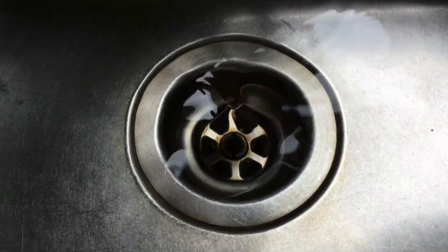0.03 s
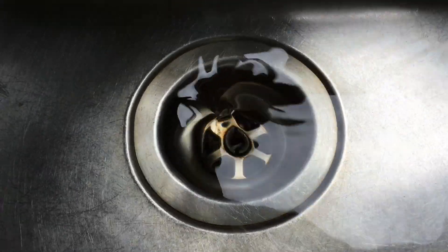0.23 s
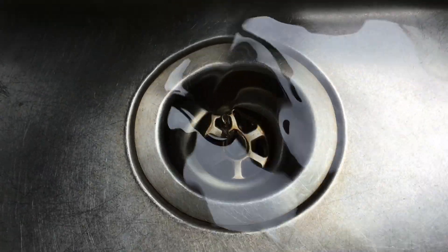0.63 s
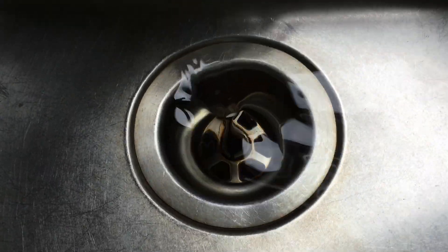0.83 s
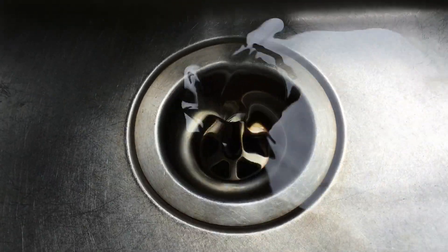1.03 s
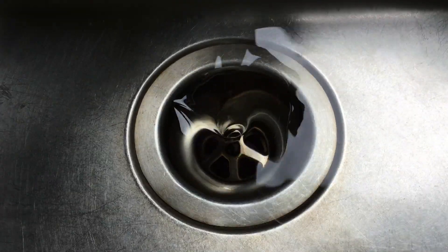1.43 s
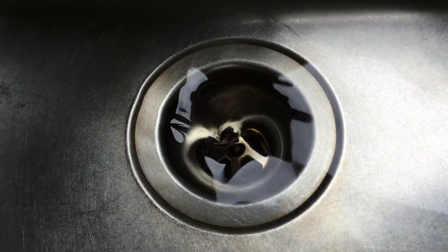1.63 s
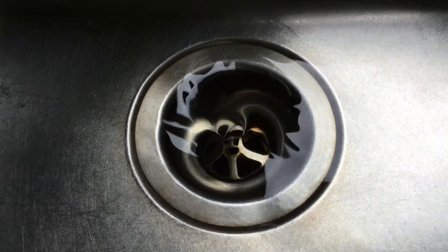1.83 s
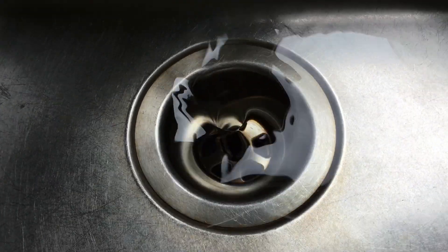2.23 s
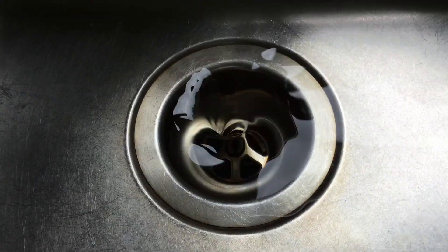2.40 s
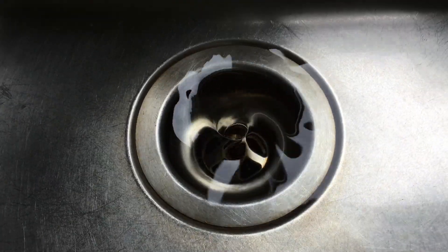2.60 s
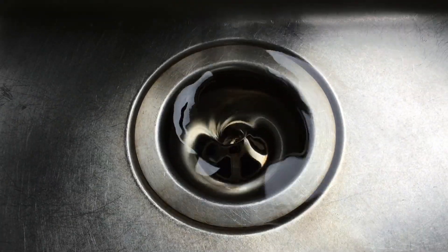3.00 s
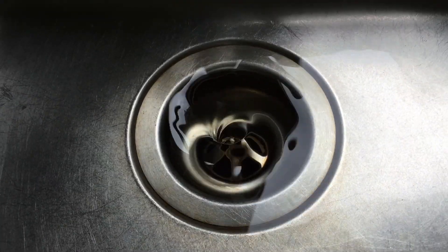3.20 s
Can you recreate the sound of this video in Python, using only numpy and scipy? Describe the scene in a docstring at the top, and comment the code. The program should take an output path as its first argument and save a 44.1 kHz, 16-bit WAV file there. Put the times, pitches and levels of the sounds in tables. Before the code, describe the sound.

Water gurgles down a steel kitchen sink drain, heard close over a steady low rush. From about 0.2 seconds, rapid, irregular hollow gulps join deep churning in the pipe and a light trickle. The gurgling is loudest around 1.2 to 1.6 seconds, with small splashes. It eases after 2.3 seconds, with a faint slurp near 2.5, and grows softer and sparser by 3.3 seconds.

```python
"""A steel kitchen sink, heard from close above, as water swirls down the drain.
Over a steady rush, churning water excites the low air modes of the waste pipe, drops and small bubbles
excite the modes of the drain's throat, and tiny bubbles fizz over the basin. The vortex gulps air:
each gulp rings the air pocket under the strainer and thumps the pipe. Splashes add clusters of pings."""
import sys
import numpy as np
from scipy import signal
from scipy.fft import rfft, irfft
from scipy.io import wavfile

SR = 44100
rng = np.random.default_rng(int(sys.argv[2]) if len(sys.argv) > 2 else 0)


def generate_wav(sig):
    """Save sig (samples, or channels by samples) to the path in sys.argv[1] as 16-bit PCM at SR."""
    pcm = np.round(np.clip(np.atleast_2d(sig).T, -1, 1) * 32767).astype(np.int16)
    wavfile.write(sys.argv[1], SR, pcm)


N = 147735
TIME = np.arange(N) / SR


def amp(db):
    """Amplitude ratio of a level in decibels."""
    return 10 ** (np.asarray(db) / 20)


def unit(x):
    """Normalisation to an rms of 1."""
    return x / np.sqrt(np.mean(x ** 2) + 1e-20)


def unit_peak(x):
    """Normalisation to a peak of 1."""
    return x / abs(x).max()


def add(mix, start_s, sound):
    """Superposition: a sound adds to the mix from its start time."""
    part = mix[max(round(start_s * SR), 0):][:len(sound)]
    part += sound[:len(part)]


def colour(x, curve):
    """Spectral shaping by rows of (frequency_hz, gain_db), interpolated in log frequency."""
    hz, db = np.transpose(curve)
    gain_db = np.interp(np.log(np.fft.rfftfreq(N, 1 / SR) + 1), np.log(hz), db)
    return irfft(rfft(x) * amp(gain_db), N)


def cavity(x, modes):
    """Modal superposition: neighbouring resonances alternate in sign, as along a tube."""
    out = np.zeros(len(x))
    for k, (hz, width_hz, db) in enumerate(modes):
        out += (-1) ** k * amp(db) * signal.lfilter(*signal.iirpeak(hz, hz / width_hz, SR), x)
    return out


def impulses(per_s, spread_db=1.5):
    """Poisson process: random impulses of either sign, mostly small and a few large."""
    chance, excess, sign = rng.random(N), rng.exponential(1, N), rng.choice([-1., 1.], N)
    return (chance < per_s / SR) * sign * amp(spread_db * np.minimum(excess, 19))


def ring(hz, peak_s, shape, glide_per_s=1, size=2600):
    """Damped oscillation of trapped air: a tone swells and dies as its pitch rises slightly."""
    t = np.arange(1, size + 1) / SR
    envelope = (t / peak_s * np.exp(1 - t / peak_s)) ** shape
    turns = np.cumsum(hz * (1 + glide_per_s * (t - peak_s))) / SR
    return envelope * np.sin(2 * np.pi * turns)


def swarm(low_hz, high_hz, per_s, spread_db, rise_cycles, shape=0.15, size=1300, count=60):
    """Minnaert resonance: bubbles ping at random times, each size at its own pitch."""
    out = np.zeros(N)
    pitches = np.geomspace(low_hz, high_hz, count)
    pings = [ring(hz, rise_cycles / hz, shape, glide_per_s=1.6, size=size) for hz in pitches]
    for when, which, strength, sign in rng.random((round(per_s * N / SR), 4)):
        db = spread_db * min(-np.log(1 - strength), 3.5)
        add(out, when * N / SR, np.sign(sign - .5) * amp(db) * pings[int(which * count)])
    return out


# Spectrum of the rushing water: frequency_hz, gain_db
RUSH_SPECTRUM = [(25, -32), (45, -12), (80, 0), (250, 4), (330, -17.5), (450, -37.5), (580, -16),
                 (666, -22), (780, -37.5), (900, -37), (1150, -37), (1340, -33), (1490, -9.5), (1710, -39),
                 (1900, -17.5), (2100, -39.5), (3700, -52.5), (6500, -63.5), (15500, -57)]
def rush():
    """Filtered noise: the steady rush of the water."""
    return amp(-43.5) * unit(colour(rng.standard_normal(N), RUSH_SPECTRUM))


# Relative levels of the flow through the drain: time_s, churn_db, trickle_db, fizz_db
FLOW_LEVELS = [(0, -42.5, -50, -79.5), (0.16, -38.5, -47, -77), (0.24, -30.5, -44.5, -74.5),
               (0.5, -31.5, -45, -81), (0.6, -28.5, -43, -74.5), (0.79, -35.5, -47, -78),
               (0.93, -30, -45, -74.5), (1.1, -25.5, -43.5, -79), (1.24, -21, -47, -70),
               (1.33, -27, -36.5, -70), (1.41, -32, -43, -76.5), (1.58, -24, -44, -77),
               (1.85, -28.5, -47.5, -75.5), (2.22, -31, -48, -76), (2.37, -41, -49, -79),
               (2.48, -33, -45, -79), (2.88, -39.5, -48, -75.5), (3.08, -42, -49.5, -78),
               (3.35, -49, -54.5, -81)]
def flow(layer):
    """Amplitude envelope: a layer's gain follows the flow through the drain."""
    time_s, churn_db, trickle_db, fizz_db = np.transpose(FLOW_LEVELS)
    level_db = {"churn": churn_db, "trickle": trickle_db, "fizz": fizz_db}[layer]
    return amp(np.interp(TIME, time_s, level_db))


# Air modes of the waste pipe: pitch_hz, bandwidth_hz, gain_db
PIPE_MODES = [(76.2, 13.3, -4.5), (114.2, 7.8, 1), (130, 15.6, 0.5), (180.5, 16.4, -1.5), (252, 9.5, 6),
              (282.4, 22, -1), (332.8, 25, -2)]
def pipe(x):
    """Standing waves in the waste pipe, with the deep bass and the treble lost."""
    passband = signal.butter(3, [66, 360], "band", fs=SR, output="sos")
    return signal.sosfilt(passband, cavity(x, PIPE_MODES))


def churn():
    """Impulse excitation: lumps of water tumble down the pipe and sound its modes."""
    return amp(-3.5) * flow("churn") * unit(pipe(impulses(per_s=830)))


def flutter():
    """Heavy damping: large bubbles tear off the vortex and die quickly, in a rough flutter."""
    bubbles = swarm(151, 324, per_s=130, spread_db=4.5, rise_cycles=0.52, shape=0.75, size=4000)
    return amp(-12) * flow("churn") * unit(bubbles)


def pocket(x, width_hz=41):
    """Cavity resonance: one hollow mode of the air pocket under the strainer."""
    return cavity(x, [(662.8, width_hz, 0)])


def burble():
    """Forced vibration: churning keeps the air pocket ringing softly between gulps."""
    ringing = pocket(impulses(per_s=900))
    focused = pocket(ringing, width_hz=164)  # steepens the skirts of the resonance
    return amp(-14) * flow("churn") * unit(focused)


def surge(depth_db=1.95):
    """Amplitude modulation: a gain that swells and slackens at random with the swirl."""
    waves = sum(np.sin(2 * np.pi * (hz * TIME + rng.random())) for hz in np.geomspace(6, 48, 30))
    return unit(amp(depth_db * unit(waves)))


# Air modes of the drain's throat: pitch_hz, bandwidth_hz, gain_db
THROAT_MODES = [(669, 9.5, 15), (1032, 53, -4), (1156.3, 23.3, 7), (1513.5, 43, 2.5), (1906, 38, -1.5),
                (2248, 44, -7), (2757, 109, -10), (3204, 18, -7.5), (3706, 34, -8), (4120, 29, -21.5),
                (4300, 13, -28.5), (5030, 150, -16), (5620, 73, -23.5)]
def throat(x):
    """Resonant filtering: the drain's throat favours sound near its modes."""
    return cavity(x, THROAT_MODES)


def trickle():
    """Impact excitation: drops off the strainer tap the air in the throat."""
    drops = swarm(841, 4460, per_s=900, spread_db=6, rise_cycles=0.28)
    taps = np.gradient(drops)  # differentiation tilts the spectrum towards the treble
    return amp(-5.5) * flow("trickle") * unit(throat(taps))


def basin(x, echo_db=-9, decay_s=0.013, size=4000):
    """Reverberation: short, dense reflections from the steel walls join the direct sound."""
    tail = rng.standard_normal(size) * np.exp(-np.arange(size) / SR / decay_s)
    return x + amp(echo_db) * signal.oaconvolve(x, tail / np.linalg.norm(tail))[:N]


# Sizzle of air sucked through the strainer: time_s, level_db
SLURP_LEVELS = [(0, -66), (0.6, -65.5), (1.0, -67.5), (1.35, -65), (1.7, -65), (2.38, -70.5), (2.5, -59),
                (2.9, -66), (3.35, -67)]
def slurp():
    """Air entrainment: suction through the strainer's water film makes small, sizzling bubbles."""
    gain = amp(np.interp(TIME, *np.transpose(SLURP_LEVELS)))
    bubbles = swarm(2579, 5400, per_s=1100, spread_db=3, rise_cycles=2.4)
    return gain * unit(throat(bubbles) + 0.15 * basin(bubbles))


def plinks():
    """Resonance: small bubbles in the throat ring loudest where they meet one of its modes."""
    bubbles = swarm(1696, 5500, per_s=600, spread_db=1, rise_cycles=1.8)
    return amp(-18) * flow("trickle") * unit(throat(bubbles) + 0.073 * bubbles)


# Spectrum of the fizz over the basin: frequency_hz, gain_db
FIZZ_SPECTRUM = [(1500, -4), (2600, -3), (3500, -13.5), (4400, -20), (5100, 1), (5700, -5), (6500, -4.5),
                 (7200, -6.5), (7700, 5.5), (8250, 3.5), (8900, -8), (10000, -4.5), (11000, -9.5),
                 (13200, -2.5), (15600, -13)]
def fizz():
    """Bubble resonance and film rupture: tiny bubbles ping, and their films snap with wet ticks."""
    pings = colour(swarm(2200, 15000, per_s=3500, spread_db=4.5, rise_cycles=4), FIZZ_SPECTRUM)
    ticks = colour(swarm(2200, 15000, per_s=960, spread_db=8, rise_cycles=1), FIZZ_SPECTRUM)
    return flow("fizz") * (amp(6.5) * unit(pings) + amp(-2.5) * unit(ticks))


# Gulps of air, levels relative within each column:
# time_s, ring_db, ring_hz, thump_db, thump_hz, upper_ring_db
AIR_GULPS = [(0.207, -28, 674, -20, 242, -34), (0.236, -23, 652, -23, 231, -40.5),
             (0.269, -26, 684, -19.5, 156, -41), (0.28, -39, 650, -22, 161, -75),
             (0.315, -32, 641, -26.5, 240, -64), (0.381, -28, 640, -19.5, 198, -38),
             (0.415, -36, 630, -23, 229, -40.5), (0.444, -25, 665, -20.5, 205, -45),
             (0.508, -29.5, 653, -25.5, 141, -42), (0.521, -44.5, 665, -18.5, 203, -51),
             (0.552, -26.5, 640, -25, 186, -68), (0.578, -22.5, 665, -29.5, 230, -56),
             (0.616, -30.5, 670, -26, 131, -45), (0.643, -25.5, 610, -23, 227, -32),
             (0.699, -20, 665, -30, 256, -34), (0.73, -25.5, 627, -20, 121, -73),
             (0.757, -38, 626, -20.5, 245, -68), (0.773, -29, 670, -27.5, 240, -38.5),
             (0.83, -29, 643, -16, 259, -43), (0.855, -19.5, 617, -25, 251, -37.5),
             (0.876, -18.5, 666, -21.5, 261, -70), (0.905, -20.5, 662, -26.5, 133.6, -35),
             (0.928, -23, 624, -20.5, 328.5, -60), (0.957, -24, 622, -24, 122, -38),
             (0.984, -25.5, 634, -24, 111, -68), (1.009, -44, 663, -31, 121, -42),
             (1.037, -21.5, 649, -19, 118, -44), (1.069, -24, 627, -17, 244, -39),
             (1.079, -24.5, 647, -28, 242, -49), (1.121, -19, 678, -13, 254, -43),
             (1.143, -23, 603, -46, 126, -60), (1.179, -17, 655, -18.5, 250, -34),
             (1.219, -23.5, 704, -31, 235, -42), (1.258, -11, 684, -28, 350, -26.5),
             (1.284, -26, 712, -29, 123, -55), (1.312, -19, 641, -14.5, 197, -32.5),
             (1.334, -19, 610, -18, 209, -41), (1.347, -18, 690, -46, 167, -37.5),
             (1.373, -45, 740, -23.5, 238, -34), (1.4, -36, 680, -35, 190, -33),
             (1.445, -21.5, 661, -33, 304, -63), (1.456, -14.5, 670, -21, 120, -43),
             (1.479, -23, 662, -21.5, 107, -57), (1.521, -21.5, 672, -20.5, 179, -59),
             (1.552, -24, 650, -15.5, 258, -44), (1.583, -30, 620, -15, 259, -47),
             (1.606, -44, 660, -29, 255, -36.5), (1.643, -23.5, 604, -18, 266, -40),
             (1.715, -30, 594, -21.5, 347, -49), (1.749, -22, 686, -27.5, 183, -38.5),
             (1.763, -24.5, 654, -19, 116, -50), (1.805, -22, 696, -17, 251, -83),
             (1.846, -26, 648, -20, 255, -70), (1.867, -34.5, 610, -20.5, 265.6, -63),
             (1.91, -25, 640, -22.5, 127, -73), (1.932, -27, 682, -33.5, 140, -61),
             (2.036, -22, 628, -19.5, 124, -74), (2.061, -35, 647, -37, 150, -37),
             (2.105, -27.5, 699, -29.5, 119, -58), (2.134, -22, 644, -21, 125.5, -57),
             (2.164, -35, 720, -23.5, 129, -43), (2.197, -64, 637, -24, 268, -48),
             (2.24, -29, 700, -18, 123, -44), (2.263, -26.5, 652, -27.5, 302, -51),
             (2.274, -21.5, 648, -24, 348, -55), (2.324, -29.5, 685, -67, 252, -50),
             (2.415, -36.5, 650, -36, 240, -61), (2.454, -22, 673, -25.5, 110, -47),
             (2.512, -32.5, 687, -25, 285, -59), (2.529, -26.5, 655, -56, 119, -55),
             (2.611, -32, 664, -35, 257, -61), (2.669, -28.5, 635, -24.5, 133, -65),
             (2.729, -29, 660, -29, 289, -43), (2.757, -32.5, 660, -49, 253, -46),
             (2.791, -30, 665, -27.5, 130, -61), (2.813, -32, 652, -22.5, 187, -57),
             (2.878, -28, 654, -24, 239, -35), (2.905, -26.5, 634, -24, 252, -42),
             (2.947, -30.5, 657, -37, 110, -51), (2.978, -62, 620, -55, 260, -39),
             (3.035, -40, 614, -26.5, 237, -59), (3.146, -56, 600, -27, 104, -55),
             (3.208, -67, 650, -31.5, 228, -71)]
def gulps(push_s=0.00088, slosh_s=0.019, slap_s=0.0023, pocket_share=0.63, size=9000):
    """Transient excitation: a gulp slaps shut, rings the air pocket along with a higher tone, and thumps the
    pipe."""
    out, rings, t = np.zeros(N), np.zeros(N), np.arange(size) / SR
    push = t / push_s * np.exp(1 - t / push_s)
    slap_band = signal.butter(2, [323, 780], "band", fs=SR, output="sos")
    slap = unit_peak(signal.sosfilt(slap_band, np.exp(-t / slap_s)))
    for time_s, ring_db, ring_hz, thump_db, thump_hz, upper_db in AIR_GULPS:
        slosh = 0.54 * rng.standard_normal(size) * np.exp(-t / slosh_s)
        shove = unit_peak(pipe(push + slosh))  # a large bubble displaces the water in the pipe
        upper_hz = 1503 * (1 + 0.015 * rng.standard_normal())
        ring_start_s, thump_start_s = time_s - 0.003352, time_s - 0.002157
        add(rings, ring_start_s, amp(ring_db + 0.5) * ring(ring_hz, peak_s=0.0064, shape=3.28))
        add(out, ring_start_s, amp(upper_db - 4) * ring(upper_hz, peak_s=0.0083, shape=3.28))
        add(out, thump_start_s, amp(ring_db - 10.5) * slap)
        add(out, thump_start_s, amp(thump_db - 6) * shove)
        add(out, thump_start_s, amp(thump_db - 3.5) * ring(thump_hz, peak_s=0.0072, shape=0.91))
    return out + (1 - pocket_share) * rings + pocket_share * pocket(rings)


# Splashes at the strainer, levels relative within each column: start_s, bubble_db, pitch_hz, spray_db
STRAINER_SPLASHES = [(0.546, -47, 14400, -56), (0.571, -51, 11400, -66), (0.572, -34, 3670, -66),
                     (0.836, -44, 3800, -69), (0.927, -36, 2660, -59), (0.958, -63, 6640, -53),
                     (1.004, -55, 12000, -69), (1.057, -42, 2660, -66), (1.22, -58, 6300, -59),
                     (1.237, -38, 5280, -51), (1.275, -47.5, 5380, -61), (1.316, -41.5, 4380, -56),
                     (1.322, -38, 5900, -46.5), (1.453, -43, 3600, -56), (1.463, -55, 5200, -52),
                     (1.778, -40, 2580, -68), (1.877, -47.5, 7000, -72), (1.942, -41, 2720, -63),
                     (2.475, -38.5, 4200, -59), (2.592, -47, 2780, -73), (2.633, -44, 2850, -50),
                     (2.811, -49.5, 7950, -68), (2.851, -44, 2730, -66), (3.044, -48, 2600, -65),
                     (3.095, -45.5, 8100, -62), (3.201, -42, 8140, -48), (3.283, -42, 2780, -54)]
def splashes(decay_s=0.006, pitch_scatter=0.115, count=12, size=2000):
    """Bubble resonance in clusters: a splash rings like-sized bubbles amid a crackle of spray."""
    out, t = np.zeros(N), np.arange(size) / SR
    spray_band = signal.iirpeak(8550, Q=1, fs=SR)
    for start_s, bubble_db, pitch_hz, spray_db in STRAINER_SPLASHES:
        cluster = np.zeros(size)
        for wait, detune in zip(np.sort(rng.exponential(1, count)), rng.standard_normal(count)):
            hz = pitch_hz * (1 + pitch_scatter * detune)
            ping = ring(hz, peak_s=0.00032, shape=0.15, glide_per_s=1.6, size=size)
            add(cluster, wait * decay_s, np.exp(-wait / 2) * ping)  # later bubbles are weaker
        drops = rng.standard_normal(size) * amp(0.5 * np.minimum(rng.exponential(1, size), 4))
        spray = signal.lfilter(*spray_band, drops * np.exp(-t / decay_s))
        add(out, start_s, amp(bubble_db - 3) * unit_peak(cluster))
        add(out, start_s, amp(spray_db - 1.5) * unit_peak(spray))
    return out


def scene():
    """Superposition of the continuous flow, the gulps and the splashes in one channel."""
    water = rush() + churn() + flutter() + burble()
    swirl = surge() * (trickle() + slurp() + basin(plinks() + fizz()))
    return (water + swirl + gulps() + basin(splashes()))[None]


def record(dry, low_cut_hz=42, high_cut_hz=15900):
    """Band limiting: filters remove the deepest bass and the highest treble."""
    highpass = signal.butter(3, low_cut_hz, "high", fs=SR, output="sos")
    lowpass = signal.firwin(511, high_cut_hz, window=("kaiser", 9), fs=SR)
    return signal.oaconvolve(signal.sosfilt(highpass, dry), lowpass[None], "same")


dry = scene()
out = record(dry)
generate_wav(out)
```